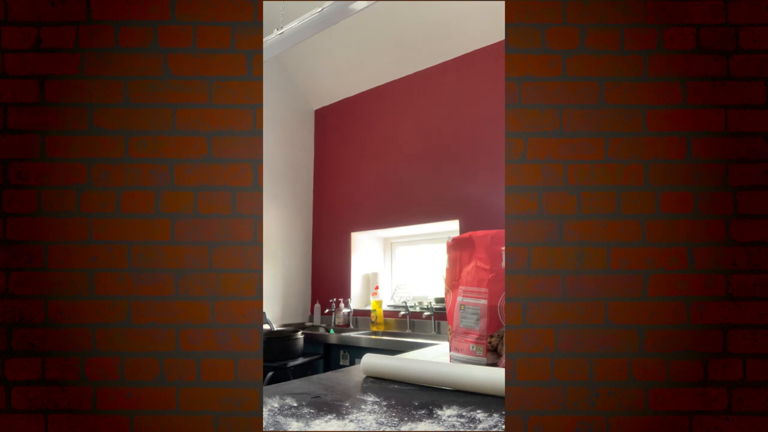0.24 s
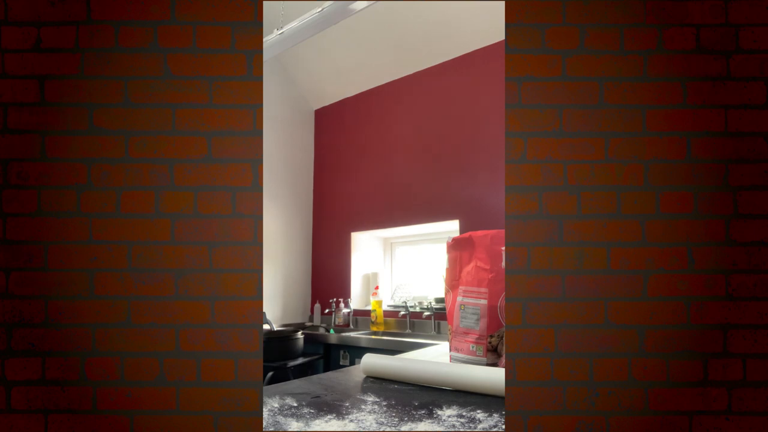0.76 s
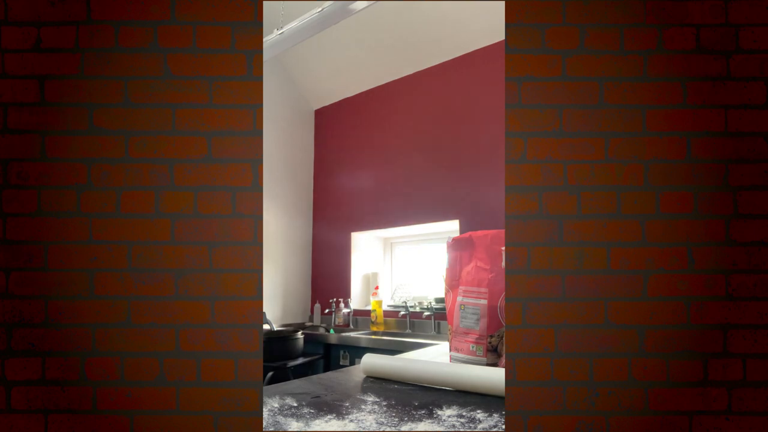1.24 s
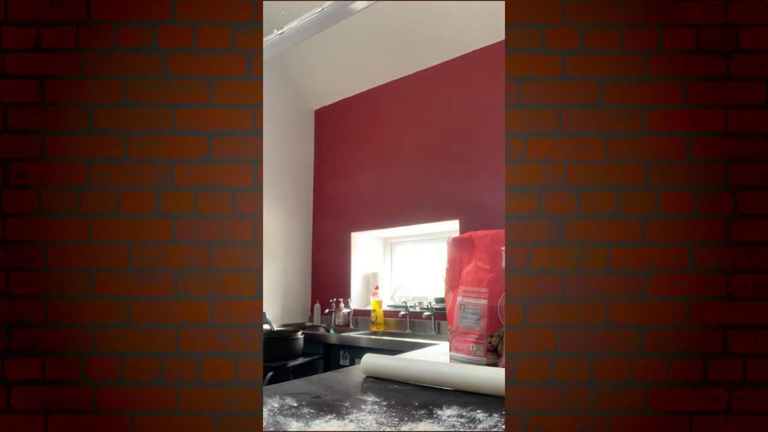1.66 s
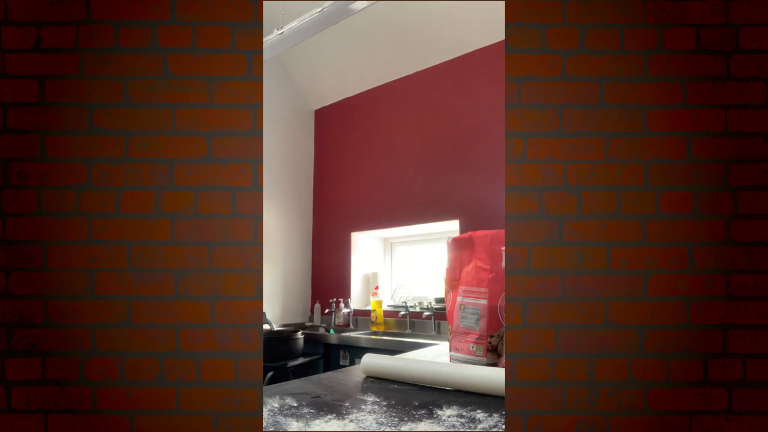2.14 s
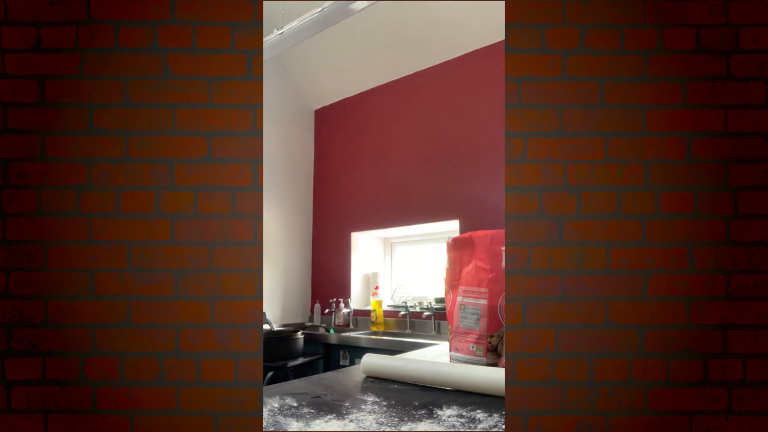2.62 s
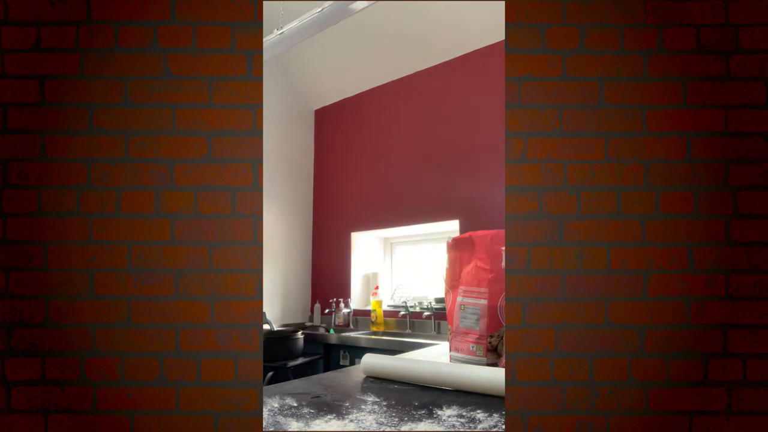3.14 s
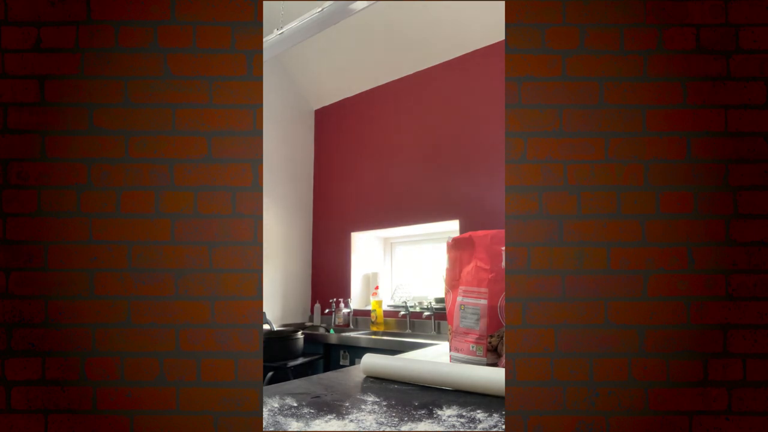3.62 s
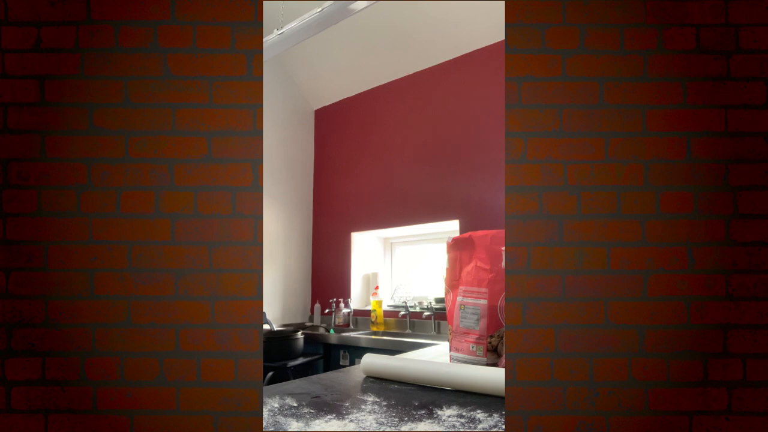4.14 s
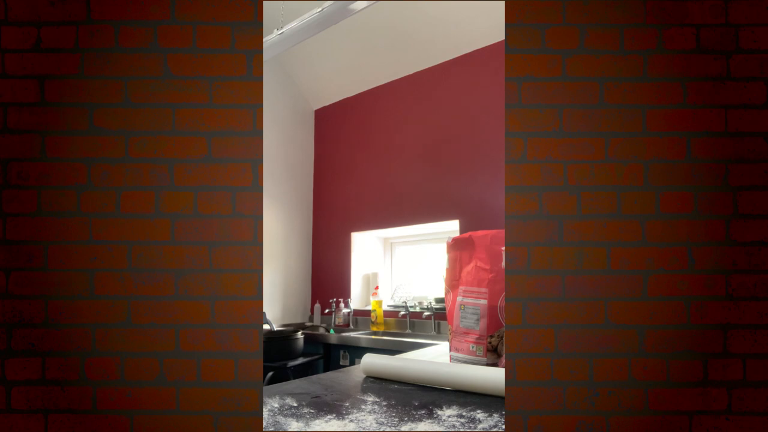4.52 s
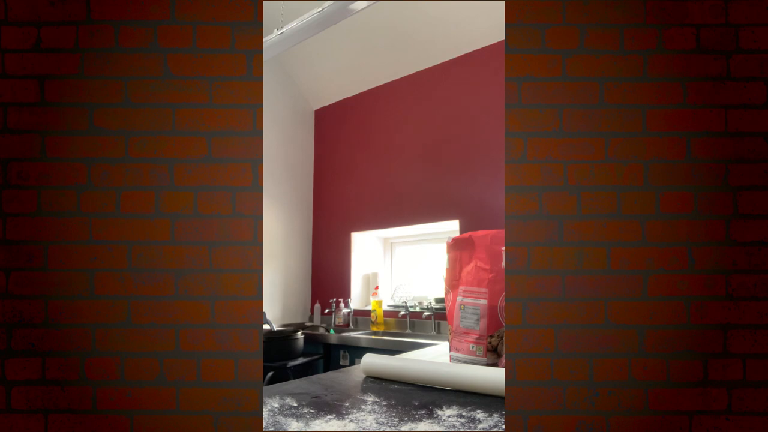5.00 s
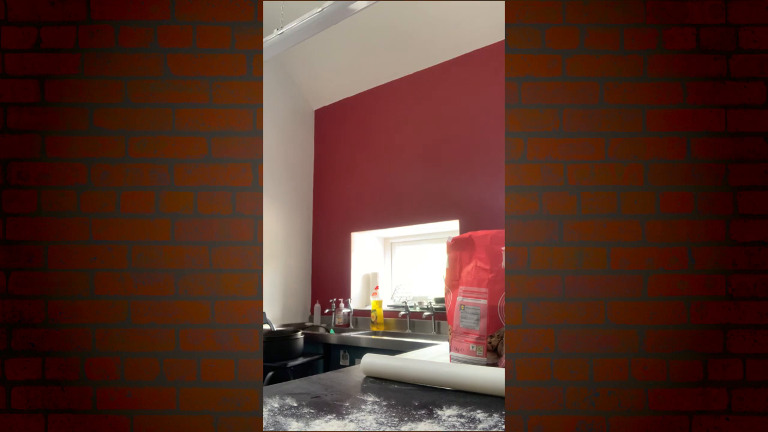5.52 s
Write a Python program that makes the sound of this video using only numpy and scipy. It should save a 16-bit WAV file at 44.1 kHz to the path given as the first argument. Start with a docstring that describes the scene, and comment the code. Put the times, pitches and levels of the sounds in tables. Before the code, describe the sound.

Constant low motor hum and midrange gear whine fill a hard-walled kitchen, with brief hissy scuffs and hollow knocks in the first couple of seconds.

```python
"""Stand mixer in a hard-walled kitchen

A large mixer runs throughout: wandering sines at multiples of its shaft speed drone with noise in the
room's modes, gear-mesh sines whine, and filtered noise makes the ringing housing and the fan's rush.
Some way off, short noise bursts make sharp hisses and knocks on the worktop that ring in the room;
a hollow note, two rough sines, lingers after the first knock.
Two microphone ports hear the bass alike, and the rest partly unlike and shifted in phase."""
import sys
import numpy as np
from scipy import signal
from scipy.fft import rfft, irfft, next_fast_len
from scipy.io import wavfile
from scipy.ndimage import uniform_filter1d, map_coordinates

SR = 44100
rng = np.random.default_rng(int(sys.argv[2]) if len(sys.argv) > 2 else 0)


def master_out(mix):
    """Clip the mix to full scale and print it as 16-bit PCM to the path in sys.argv[1]."""
    frames = np.transpose(np.atleast_2d(mix))
    ceiling = np.clip(frames, -1, 1)
    pcm = np.round(ceiling * 32767).astype(np.int16)
    wavfile.write(sys.argv[1], SR, pcm)


N = 254016  # length in samples

# hollow note that lingers after the first knock: (t/s, f/Hz, level/dB)
NOTE_GLIDE = [(1.03, 1200, -58), (1.057, 1200, -49), (1.102, 1240, -53), (1.151, 1262, -30),
              (1.23, 1260, -35), (1.26, 1154, -42), (1.3, 1073, -40), (1.36, 1100, -67)]
# hisses: (t/s, level/dB, rise/s, fall t60/s)
HISS_EVENTS = [(0.724, -19.5, 0.0065, 0.12), (0.766, -16, 0.014, 0.13), (1.197, -16, 0.022, 0.098),
               (1.879, -29, 0.0093, 0.21), (1.921, -16.5, 0.011, 0.11)]
# colour of a hiss: (f/Hz, level per Hz/dB)
HISS_COLOUR = [(700, -44), (1500, -27), (3500, -4.5), (4500, -8), (5500, -6.5), (6500, 1), (7800, -3),
               (9000, 3.5), (10500, -8.5), (11500, -9)]
# knocks: (t/s, thud level/dB, hollow level/dB, rim level/dB, snap level/dB, rise/s, fall t60/s)
KNOCK_EVENTS = [(1.022, -21, -18.5, -18, -22.5, 0.009, 0.15), (1.2, -31.5, -28, -31.5, -35, 0.0044, 0.21),
                (1.85, -40, -36, -42, -45.5, 0.011, 0.58), (2.092, -38, -37, -20, -47, 0.0046, 0.12),
                (2.11, -10.5, -29.5, -33, -31, 0.0022, 0.088)]
# colour of the worktop's thud: (f/Hz, level per Hz/dB)
THUD_COLOUR = [(350, -43), (550, -5), (800, -5.5), (1200, -5), (1800, 2.5), (2700, -4), (3600, -9),
               (4500, -24), (5500, -51)]
# low ring of the struck vessel: (f/Hz, width/Hz, level/dB)
VESSEL_MODES = [(1030, 75, -8.5), (1093, 39, -6), (1213, 27, 0.5), (1254, 32, 0), (1410, 180, -9)]
# ring of the vessel's rim: (f/Hz, width/Hz, level/dB)
RIM_MODES = [(2293, 55, -1.5), (2280, 60, 3), (3020, 210, 0), (3250, 230, -3), (3560, 150, -3.5),
             (4320, 640, -10)]
# colour of the snap of contact: (f/Hz, level per Hz/dB)
SNAP_COLOUR = [(3500, -38), (5000, -3.5), (7000, -3.5), (10000, -9), (11500, -22.5)]
# reverberation of the kitchen: (f/Hz, t60/s)
KITCHEN_DECAY = [(500, 1), (1500, 0.76), (3000, 0.68), (7000, 0.69), (11000, 0.37)]

SHAFT_HZ = 24.446
# shaft orders in the lowest hum, the drone and the boom: (multiple of shaft speed, level/dB, wander/Hz)
THRUM_ORDERS = [(2, -16.5, 0.26), (2.4, -12.5, 0.96), (3, -10.5, 1.7), (4.05, -5, 0.91)]
DRONE_ORDERS = [(6, -13, 2.035), (7.2, -13.5, 1.59), (8, -10.5, 1.97), (9, -7, 1.76)]
BOOM_ORDERS = [(11, -11.5, 1.69), (12, -5, 1.046), (13, -9, 2.187), (15, -17, 1.76)]
# frame rumble in the room's modes, one table for each of those layers: (f/Hz, width/Hz, level/dB)
THRUM_ROOM_MODES = [(58.3, 25, -12), (96, 26.5, -6.5)]
DRONE_ROOM_MODES = [(155.6, 14.5, -3.5), (196.2, 54, -1.5), (219.2, 15, -0.5)]
BOOM_ROOM_MODES = [(261, 16.6, -2), (301.5, 42, -7.5), (323, 33, 0.5), (365.3, 17, -9), (402, 41, -11)]
# uneven level of the three layers: (t/s, lowest hum level/dB, drone level/dB, boom level/dB)
HUM_LEVELS = [(0.1, -32.5, -25.5, -23.5), (0.44, -29, -24.5, -28), (0.71, -30, -27, -20.5),
              (1.06, -28, -29.5, -24.5), (1.4, -29.5, -24, -21), (1.77, -25, -26, -28),
              (2.17, -28, -22.5, -25), (2.52, -26, -26, -23.5), (3.36, -30.5, -21, -24),
              (3.61, -27, -27, -24.5), (4.43, -29, -25, -25.5), (4.71, -30, -25.5, -23),
              (4.96, -29.5, -28.5, -27), (5.6, -27.5, -24.5, -22)]
# gear mesh and its sidebands: (f/Hz, level/dB, wander/Hz)
MESH_LINES = [(1820, -11, 5), (1857, -5, 3), (1874, -9, 4), (1897, -12, 4)]
# resonances of the gearbox cover: (f/Hz, width/Hz, level/dB)
GEARBOX_MODES = [(1811, 51, 0.5), (1855, 25, 9), (1870, 160, -15)]
# uneven level of the gear whine: (t/s, level/dB)
WHINE_LEVELS = [(0.1, -36), (0.35, -30.5), (2.45, -33), (3.31, -33.5), (3.62, -30), (4.37, -33.5),
                (4.62, -36.5), (4.83, -34), (5.26, -32), (5.7, -32)]
# weaker ringing of the housing: (f/Hz, width/Hz, level/dB)
HOUSING_MODES = [(478, 18, -38), (530, 43, -47), (568, 23, -47.5), (595, 21, -50), (715, 28, -54),
                 (734.3, 25, -43.5), (974, 37, -49), (1183, 16, -65), (1282, 30, -50), (1374, 44, -76),
                 (1667, 40, -61), (2020, 68, -49.5), (2276, 20, -58), (2563, 9.5, -56.5), (2730, 21, -74.5),
                 (3080, 74, -58.5), (3220, 42, -56), (3466, 85, -51), (3643, 120, -46.5)]
# colour of motor fan and gear rush: (f/Hz, level per Hz/dB)
RUSH_COLOUR = [(250, -31), (420, -0.5), (600, -6.5), (1000, -10.5), (1400, -9), (1650, -15), (2300, -17),
               (3300, -21.5), (4100, -22), (7800, -26.5), (8500, -32.5), (10000, -28), (10700, -34),
               (11300, -79)]
WAVER_DB, WAVER_RATE = 1.5, 7  # waver of each hum and the whine: depth in dB, random knots a second
# random swell of the lower rush and housing: depth in dB, knots a second, upper edge in Hz
MURMUR_DB, MURMUR_RATE, MURMUR_HZ = 1.76, 7.6, 1100

# likeness of the two ports: (f/Hz, likeness 0-1)
PORT_LIKENESS = [(150, 1), (230, .97), (330, .7), (450, .5), (700, .3), (1500, .55), (2500, .45),
                 (3800, .3), (4700, .85), (6000, .88), (10000, .94)]
# phase between the ports: (f/Hz, left lead/rad)
PORT_LEAD = [(150, 0), (340, .45), (550, 3), (900, 5.5), (1400, 4.3), (2000, 3.6), (3000, 3.9), (3600, 2.5),
             (4400, 3.2), (5000, 2.8), (7600, .1), (9000, -.1), (10800, -1.7)]
# balance of the ports: (f/Hz, left minus right level/dB)
PORT_TILT = [(60, 0), (110, -2.5), (190, -2), (340, -9.5), (600, 4.5), (1060, -1), (1890, 1.5),
             (3360, -0.5), (5970, 0.0), (10600, 0.0)]
TOP_HZ = 11200  # band limit of the ports


def amp(db):
    """Decibels to gain."""
    return 10 ** (np.asarray(db) / 20)


def unit(x):
    """Scaled to rms 1."""
    return x / np.sqrt(np.mean(x ** 2) + 1e-20)


def along(points, hz):
    """A curve through (f/Hz, value) points on a log frequency axis."""
    f, value = np.transpose(points)
    return np.interp(np.log(hz + 1), np.log(f + 1), value)


def wobble(rate):
    """Two smooth random curves, rate knots a second."""
    knots = rng.standard_normal((2, N // 500))
    return np.array([map_coordinates(k, [np.arange(N) * rate / SR]) for k in knots])


def filtered(x, response):
    """x shaped by a complex response of frequency."""
    m = next_fast_len(x.shape[-1] + SR // 2)
    spectrum = rfft(x, m) * response(np.fft.rfftfreq(m, 1 / SR))
    return irfft(spectrum, m)[..., :x.shape[-1]]


def noise(response, size=N):
    """Two unrelated coloured noises of rms 1."""
    return unit(filtered(rng.standard_normal((2, size)), response))


def coloured(spectrum):
    """The gain of (f/Hz, level/dB) points, closed below the first and level above the last."""
    return lambda hz: amp(along(spectrum, hz)) * (hz > spectrum[0][0])


def resonant(modes):
    """Steep resonances whose powers add."""
    def response(f):
        return np.sqrt(sum(amp(2 * db) / (1 + (2 * (f - hz) / width) ** 2) ** 2
                           for hz, width, db in modes))
    return response


def tones(lines, flutter_db):
    """Sines whose pitch wanders and whose level flutters."""
    total = 0
    for hz, db, wander in lines:
        level = amp(db + flutter_db * wobble(9)) * np.sqrt(2)
        cycles = np.cumsum(hz + wander * wobble(5), axis=1) / SR
        total = total + level * np.sin(2 * np.pi * cycles)
    return total


def patchy(x, depth_db):
    """Random gain in patches some hundred Hz wide and some tens of ms long."""
    z = signal.stft(x, nperseg=512)[2]
    field = uniform_filter1d(rng.standard_normal(z.shape[1:]), size=3, axis=0)  # across frequency
    field = uniform_filter1d(field, size=8, axis=1)  # across time
    return signal.istft(z * amp(depth_db * unit(field)), nperseg=512)[1][:, :x.shape[1]]


def burst_shape(t, rise, t60, rough_db):
    """A soft start, a fall, and an uneven grain of a few ms."""
    grain = wobble(163)[0, :len(t)]
    return (1 - np.exp(-t / abs(rise))) ** 2 * amp(rough_db * grain - 60 * t / t60)


def in_room(burst, wet_db):
    """A burst and its own reverberation, each frequency dying at its own speed."""
    hz, t, z = signal.stft(rng.standard_normal((2, SR)), SR, nperseg=256)
    decay = amp(-60 * t / along(KITCHEN_DECAY, hz)[:, None])
    tail = signal.istft(z * decay, SR, nperseg=256)[1]
    sound = signal.fftconvolve(burst, amp(wet_db) * tail / np.linalg.norm(tail[0]), axes=1)
    sound[:, :burst.shape[1]] += burst
    return sound


def add(track, s, sound):
    """Mixes a sound in at s seconds."""
    track[:, round(s * SR):][:, :sound.shape[1]] += sound


def hollow_note():
    """A rough gliding tone with a fainter one below it."""
    s, pitch, level_db = np.transpose(NOTE_GLIDE)
    t = np.arange(N) / SR
    hz = np.interp(t, s, pitch)
    level = amp(np.interp(t, s, level_db, left=-200, right=-200))  # silent outside the glide
    return level * tones([(hz, 0, 12), (0.74 * hz, -5, 15)], flutter_db=4.3)


def hisses():
    """Short bright bursts of noise that ring in the room."""
    track, t = np.zeros((2, N)), np.arange(SR // 2) / SR
    for s, db, rise, t60 in HISS_EVENTS:
        shape = amp(db) * burst_shape(t, rise, t60, rough_db=4.5)
        burst = shape * noise(coloured(HISS_COLOUR), size=len(t))
        add(track, s, in_room(burst, wet_db=2.5))
    return track


def knocks():
    """A rough contact that sounds the worktop, a hollow vessel and its rim."""
    track, t = np.zeros((2, N)), np.arange(SR // 2) / SR
    colours = coloured(THUD_COLOUR), resonant(VESSEL_MODES), resonant(RIM_MODES), coloured(SNAP_COLOUR)
    for s, *levels, rise, t60 in KNOCK_EVENTS:
        body = sum(amp(db) * noise(colour, size=len(t)) for db, colour in zip(levels, colours))
        shape = burst_shape(t, rise, t60, rough_db=1.5)
        add(track, s, in_room(shape * body, wet_db=7))
    return track


def uneven_gain(s, db):
    """The gain of an uneven level curve with a random waver on top."""
    return amp(np.interp(np.arange(N) / SR, s, db) + WAVER_DB * wobble(WAVER_RATE)[0])


def hum(orders, flutter_db, modes, rumble_db):
    """Multiples of the shaft speed over frame rumble that excites the room's modes."""
    lines = [(k * SHAFT_HZ, db, wander) for k, db, wander in orders]
    return unit(tones(lines, flutter_db) + amp(rumble_db) * noise(resonant(modes)))


def hums():
    """Lowest hum, drone and boom, each uneven in level on its own."""
    s, *levels = np.transpose(HUM_LEVELS)
    thrum, drone, boom = [uneven_gain(s, db) for db in levels]
    low = thrum * hum(THRUM_ORDERS, 0.79, THRUM_ROOM_MODES, -3)
    low += drone * hum(DRONE_ORDERS, 5.13, DRONE_ROOM_MODES, -1.5)
    low += boom * hum(BOOM_ORDERS, 2.2, BOOM_ROOM_MODES, -4.5)
    return low


def gear_whine():
    """Gear-mesh tones with noise in the gearbox cover's resonances."""
    level = uneven_gain(*np.transpose(WHINE_LEVELS))
    return level * unit(tones(MESH_LINES, 2.3) + noise(resonant(GEARBOX_MODES)))


def housing_and_rush():
    """Noise rings the housing's modes and rushes like fan and gears; its lower part swells at random."""
    t = np.arange(N) / SR
    housing = sum(amp(db) * noise(resonant([(hz, width, 0)])) for hz, width, db in HOUSING_MODES)
    # dB: the rush breathes at random and trembles 25 times a second
    turning = 0.43 * wobble(3.306) + 0.38 * np.sin(2 * np.pi * 25.0 * t)
    rush = amp(-34.0 + turning) * noise(coloured(RUSH_COLOUR))
    steady = patchy(housing + rush, depth_db=2.0)
    lower = filtered(steady, lambda hz: 1 / (1 + (hz / MURMUR_HZ) ** 4))
    swell = amp(MURMUR_DB * wobble(MURMUR_RATE)[0])
    return steady + (swell - 1) * lower


def mixer():
    """The running machine: hums of shaft and frame, gear whine, housing and rush."""
    return hums() + gear_whine() + housing_and_rush()


def scene():
    """Two arrivals of the same sound field, with unrelated noise and wander."""
    return hollow_note() + hisses() + knocks() + mixer()


def record(dry):
    """The ports share one arrival, shifted in phase, and take the other with opposite signs."""
    side = np.array([[.5], [-.5]])  # left, right

    def colour(hz):
        balance = amp(side * along(PORT_TILT, hz)) * np.exp(1j * side * along(PORT_LEAD, hz))
        return balance * (hz < TOP_HZ) / (1 + (43 / (hz + 1)) ** 6)  # band limit, deep bass cut

    def likeness(hz):
        return np.clip(along(PORT_LIKENESS, hz), 0, 1)

    shared = filtered(dry[0], lambda hz: colour(hz) * np.sqrt((1 + likeness(hz)) / 2))
    split = filtered(dry[1], lambda hz: 2 * side * colour(hz) * np.sqrt((1 - likeness(hz)) / 2))
    return shared + split


dry = scene()
out = record(dry)
master_out(out)
```